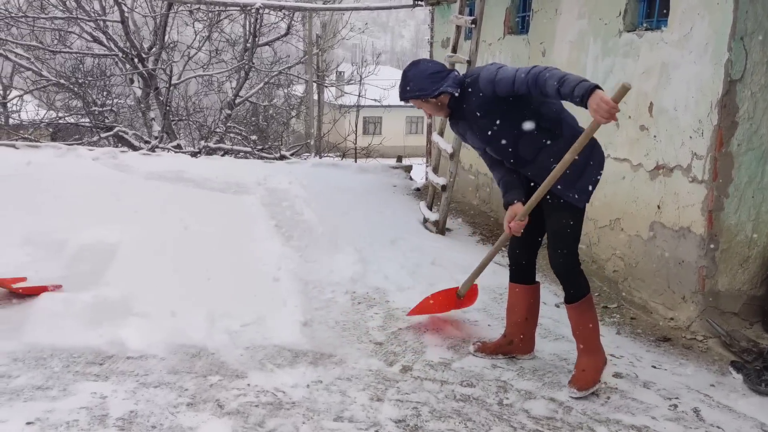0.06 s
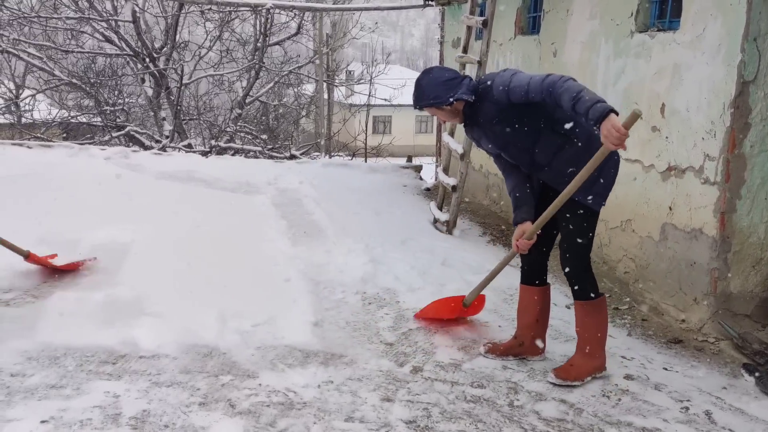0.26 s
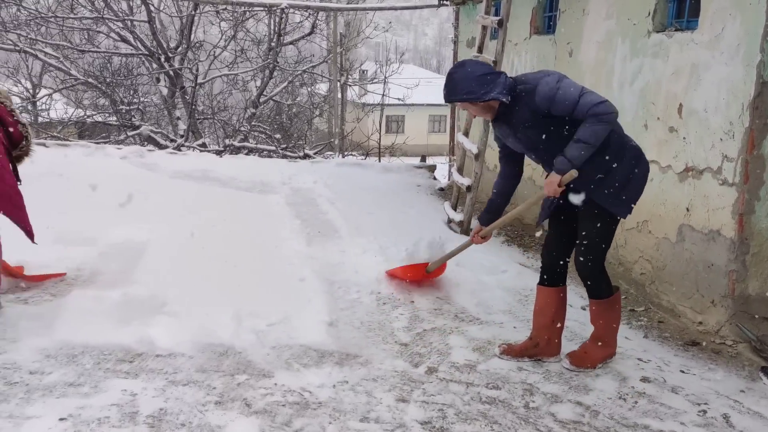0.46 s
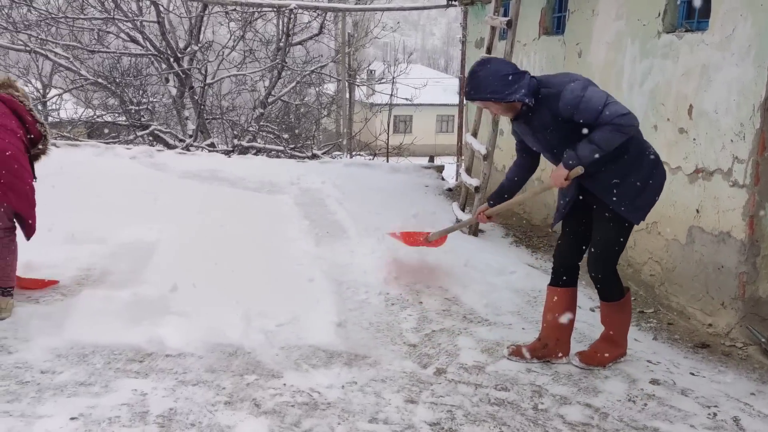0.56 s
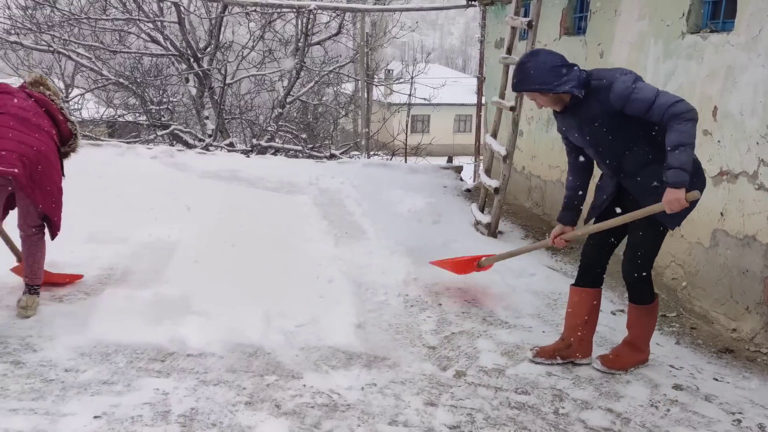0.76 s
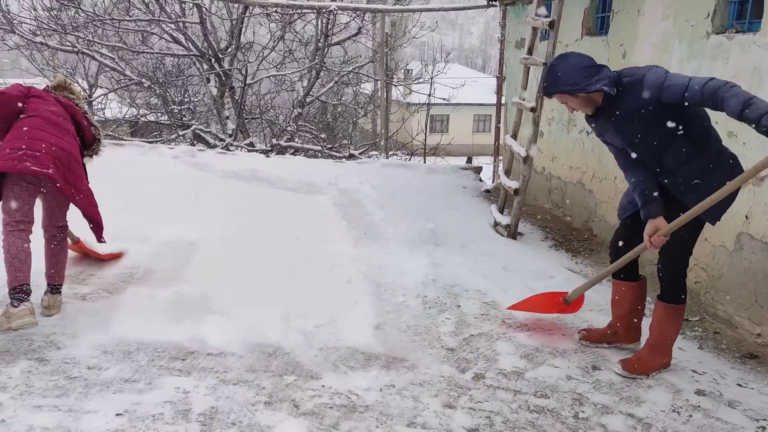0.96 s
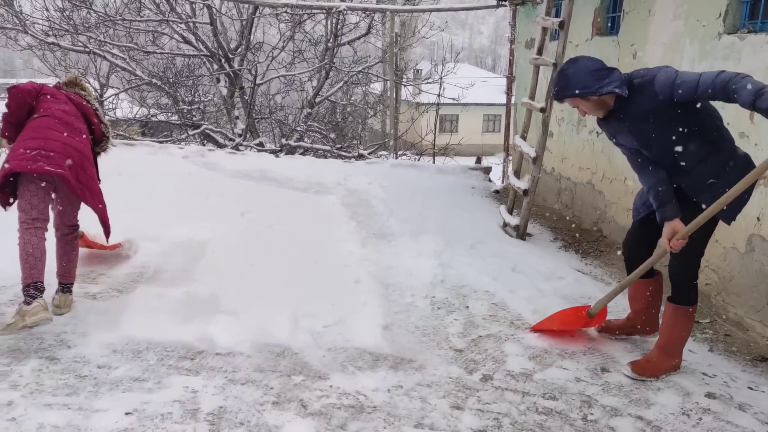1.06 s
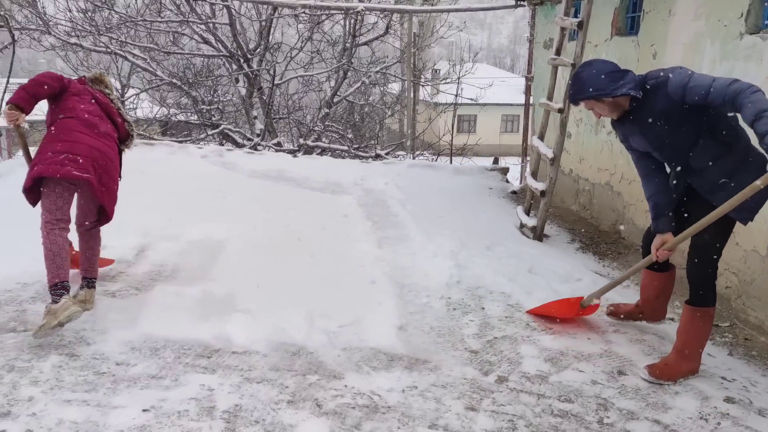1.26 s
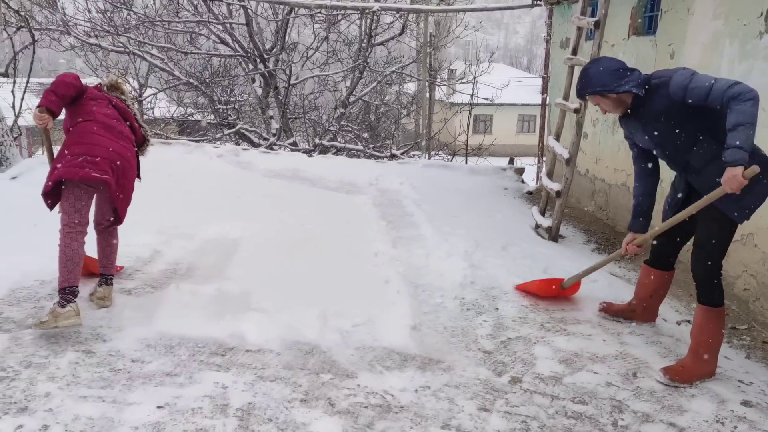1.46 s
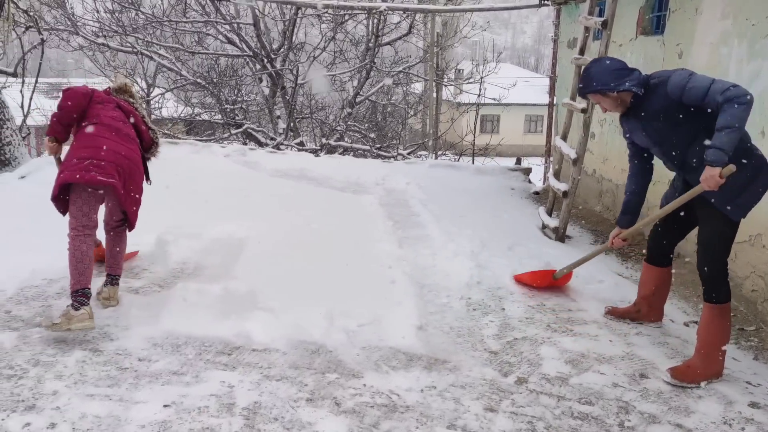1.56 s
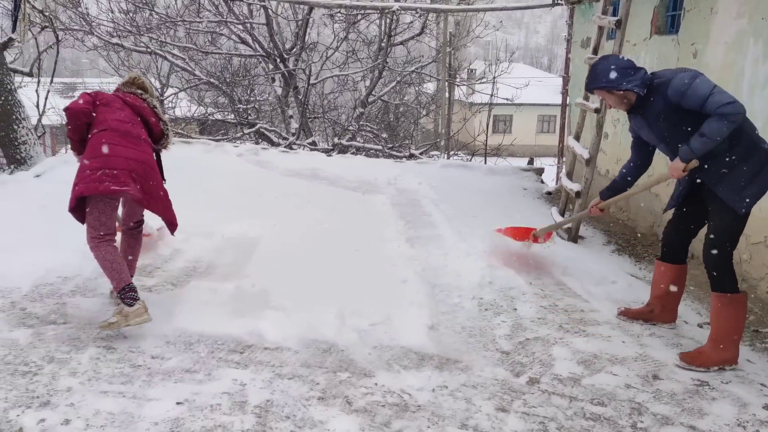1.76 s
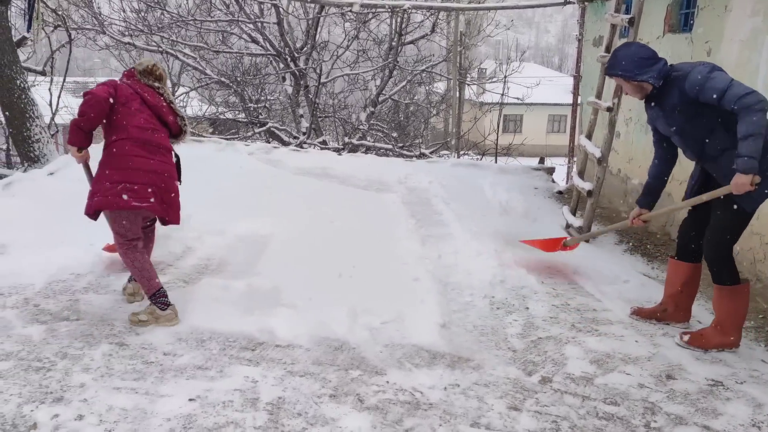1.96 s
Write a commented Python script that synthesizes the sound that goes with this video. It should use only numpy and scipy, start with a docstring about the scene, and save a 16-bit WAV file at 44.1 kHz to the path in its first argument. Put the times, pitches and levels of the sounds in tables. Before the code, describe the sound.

Two plastic shovels scrape gritty ice outdoors: a soft far scrape, a hard near stroke, a far push, then a long loud near push with crackling lumps, ending in near silence and a faint boot crunch.

```python
"""Two snow shovels on hard ice

A quiet yard with faint air: one plastic shovel scrapes close to the microphone, one farther off to the side.
Each edge sticks and slips: dense uneven clicks ring the blade, thump the load and crush grit and fine dust.
Lumps crack at their own pitch, the near blade lands with short pushes, ice snaps as bright noise, a boot crunches.
Decaying noise gives the short echo of wall and ground; the two microphone ports differ in time and colour."""
import sys
import numpy as np
from scipy import signal
from scipy.fft import rfft, irfft
from scipy.io import wavfile
from scipy.ndimage import uniform_filter1d

SR = 44100
rng = np.random.default_rng(int(sys.argv[2]) if len(sys.argv) > 2 else 0)


def log_audio(samples):
    """Write samples as a 16-bit WAV file to the path given in sys.argv[1]."""
    # one column per channel
    frames = np.atleast_2d(samples).T
    # limit to full scale, then quantise
    limited = np.clip(frames, -1, 1)
    pcm = np.round(limited * 32767).astype(np.int16)
    wavfile.write(sys.argv[1], SR, pcm)


N = 88200

# colour of the yard air: (frequency [Hz], relative level [dB])
YARD_COLOUR = [(15, -29), (25, 6.5), (66, -5), (293, -4.5), (1440, -7.5), (2840, -11), (4740, -8.5),
               (5140, -7.5), (7310, -10), (8140, -18), (10400, -19), (16000, -25)]
YARD_DB = -55
ECHO_DB, ECHO_T60_S, ECHO_LOW_HZ, ECHO_TOP_HZ = -25, 0.14, 300, 3560

# boot pressing snow: (time [s], level [dB])
BOOT_LEVEL = [(1.87, -63), (1.876, -54), (1.888, -46), (1.924, -46.5), (2.0, -41)]
BOOT_HZ, BOOT_WIDTH_HZ, BOOT_CRUNCH_DB = 215, 140, -11
BOOT_RIGHT_LAG = 10  # samples

# brittle ice snapping: (time [s], level before colouring [dB])
ICE_TICKS = [(.2925, -18), (0.373, -16), (0.465, -15.5), (.5982, -23), (.837, -30), (0.968, -22),
             (1.3605, -22)]
# colour of the snaps: (frequency [Hz], level [dB])
TICK_COLOUR = [(1500, -30), (3500, -3), (8000, -4), (16000, -11.5)]
TICK_S = 0.0009  # decay constant

# near blade set down hard: (time [s], blade peak [dB], thump peak [dB])
BLADE_LANDINGS = [(.2328, -21.5, -28), (.3065, -16, -30), (1.1703, -29.5, -31), (1.4197, -20, -22)]
LANDING_S = 0.00043  # decay constant of the push

# stretches of scraping, one list each: (time [s], blade ring [dB], low thump re blade [dB],
# grit re blade [dB], treble re blade [dB])
FAR_STRETCHES = [
    [(0.0, -44.5, -28, -1, -14), (0.068, -45, -9.5, 3, -13), (0.104, -39.5, -32, -1.5, -13),
     (0.158, -39.5, -27, 2.5, -15), (0.188, -29.5, -39, -3, -31), (0.214, -37.5, -14, 8, -13),
     (0.234, -30.5, 0, -3, -16), (0.27, -32, -13, -8.5, -25), (0.3, -39, -2, 5, -17)],
    [(0.595, -46.5, 4, 4, -11), (0.627, -43.5, -16, 5, -14), (0.641, -36, -10.5, -5.5, -18),
     (0.673, -47, -3, 3, -11), (0.691, -36.5, -25, -8.5, -20), (0.703, -48, -7, -1, -15),
     (0.719, -43, -4, -6.5, -17), (0.765, -71, 4, 10, 7), (0.77, -55, -9, -1, -8)],
]
NEAR_STRETCHES = [
    [(0.232, -33.5, 5, -2.5, -23), (0.286, -38.5, -12, 2, -16), (0.296, -40, -4, 0, -10),
     (0.306, -23.5, -8, -10, -26), (0.38, -19.5, -5.5, -7, -16.5), (0.404, -13.5, -13.5, -9.5, -28),
     (0.468, -22.5, -14, -0.5, -14), (0.476, -15.5, -11, -11.5, -27), (0.534, -23.5, -11, -8, -19.5),
     (0.58, -55, 8.5, 1.5, -9), (0.6, -57, -2, 8, 3)],
    [(1.169, -40, 6, -9, -21), (1.177, -31.5, -9, -3, -21), (1.198, -39.5, 0.5, -2.5, -17),
     (1.206, -45, -2, 2, -15), (1.218, -34, -2, -3.5, -16), (1.26, -52.5, 0, -1, -22),
     (1.265, -49, 12, -5, -15)],
]
# the far scrape carried on firmly: (time [s], blade [dB], thump, grit and treble re blade [dB])
FAR_PUSH = [(0.77, -48, -3, -7, -8), (0.78, -39, -20, -10, -29), (0.842, -33.5, -2.5, -5.5, -11.5),
            (0.85, -25, -21, -10, -19), (0.878, -28.5, -13, -5, -17), (0.902, -31.5, -9, 6, -3),
            (0.926, -23.5, -28, 0.5, -13), (0.936, -34.5, -3, 5.5, -6), (0.964, -32, -4.5, 4, -16),
            (0.984, -31.5, -7.5, 4.5, -11.5), (1.006, -49, 2, 8.5, -4), (1.054, -49.5, -12, 5.5, -6),
            (1.08, -72.5, -3, 15.5, 1), (1.12, -75, -1, 6, 1)]
# the near scrape carried on at length: (time [s], blade [dB], thump, grit and treble re blade [dB])
NEAR_PUSH = [(1.265, -37, 8, -10, -19), (1.279, -22.5, -3, -5.5, -23), (1.311, -20.5, -11, -10.5, -18.5),
             (1.345, -33.5, 4.5, -3, -17), (1.389, -19, -8.5, -7, -20), (1.409, -27, -5, -7, -21),
             (1.431, -18.5, -4, -1, -14), (1.455, -19, -2, -7, -16), (1.483, -17.5, -8.5, -6, -21.5),
             (1.515, -11, -15.5, -13, -30.5), (1.563, -20.5, -10, -2, -13), (1.593, -13, -32, -8, -21.5),
             (1.617, -17, -11, -8.5, -18), (1.637, -16, -2.5, -1.5, -25), (1.647, -18.5, -10.5, -9.5, -26),
             (1.697, -15, -11, -11.5, -28), (1.743, -24, -20, -12, -25), (1.751, -38, -9, -2.5, -17),
             (1.815, -53.5, 2, -9.5, -28), (1.86, -79, -3.5, 4, -3)]
# delay of the left port behind the right, one per near stretch, the push last [samples];
# negative means left is earlier
NEAR_LEFT_LAGS = [-2.48, -7, -6.5]
FAR_LEFT_LAG = 10.0  # samples

# lumps catching the edge: (time [s], crack level before the common trim [dB], blade drive re that level [dB],
# crack pitch [Hz], crumble decay [ms], treble re that level [dB])
FAR_LUMPS = [(0.0744, -27.5, -33, 4400, 2.2, -15), (0.1067, -23.5, -31, 3560, 5.3, -15),
             (0.1446, -27.5, -29, 4220, 4, -20), (0.18, -18, -10, 5800, 3.8, -22),
             (0.2084, -20.5, -37, 3880, 2.9, -12), (0.2172, -22.5, -17, 5030, 4.5, -22),
             (0.2922, -18, -27, 3770, 2.7, -20), (0.597, -26, -30, 4000, 1.5, -22),
             (0.629, -41, -16, 4900, 1.8, -26), (0.6414, -29, -12, 3930, 1.1, -21),
             (0.6614, -43, -1, 6540, 2, -27), (0.6904, -35, -8, 3630, 3.3, -23),
             (0.7387, -33, -12, 3720, 2.8, -25), (0.819, -28, -18, 5040, 3.7, -30),
             (0.837, -25, 5.5, 4200, 2.2, -21), (0.8484, -24, -1, 3640, 3.1, -24),
             (0.8744, -23, -5, 3620, 4.6, -27), (0.894, -15.5, -11, 3740, 3.7, -22),
             (0.9028, -13.5, -14.5, 4200, 3.4, -27), (0.9204, -13.5, -3, 4670, 1.3, -26),
             (0.9682, -11.5, -15.5, 4120, 2.5, -32), (0.9854, -19, -23, 5100, 1.9, -27),
             (1.0167, -40, -3, 3650, 1.9, -22), (1.049, -36, -12, 6680, 2.4, -28)]
NEAR_LUMPS = [(0.2332, -16, -2.5, 2060, 2.1, -17), (0.3076, -17.5, 5, 2100, 2.2, -30),
              (0.3142, -16.5, 6.5, 3700, 2.4, -25), (0.3436, -14, 1.5, 2090, 2.2, -30),
              (0.3546, -10.5, 1.5, 2080, 1.8, -28), (0.3734, -3.5, -3, 2180, 2.16, -21),
              (0.3905, -10.5, -1, 3550, 3.5, -31), (0.4, -5, 1, 2960, 3, -33),
              (0.4125, -7, -4.5, 2340, 1.7, -32), (0.4222, -12, -16, 2490, 1.9, -29),
              (0.4632, -14, -13, 2210, 1.9, -28), (0.5026, -12, -2, 2200, 2.5, -15),
              (1.1776, -32, 3, 4330, 1.8, -23), (1.2134, -28.5, 1, 2270, 1.8, -28),
              (1.2664, -31, -1, 4160, 2.2, -28), (1.276, -31, -4, 4130, 2.2, -20),
              (1.2958, -21.5, -7, 5280, 1.9, -15), (1.3135, -17.5, -1, 2450, 1.3, -18),
              (1.3602, -15.5, -5, 2230, 1.2, -23), (1.385, -11.5, -5.5, 2210, 2.5, -20),
              (1.4251, -9, -8, 2270, 3, -17), (1.4335, -6.5, -4, 2370, 3.4, -24),
              (1.4483, -11.5, 1.5, 4370, 2.1, -6), (1.4591, -10.5, 3, 2690, 2.5, -24),
              (1.4664, -10.5, -12, 2660, 2.3, -17), (1.4921, -15, -1, 2170, 2, -26),
              (1.532, -8, -3, 2220, 2.5, -30), (1.5863, -9, 1.5, 2450, 1.8, -16),
              (1.633, -18, -12, 2320, 1.3, -23), (1.7344, -24, 6, 2320, 1.8, -15)]
LUMP_TRIM_DB, LUMP_RING_DB, LUMP_Q, LUMP_THUMP_DB = -4.5, -2.7, 5.3, -10.5
OWN_NOISE = 0.43  # noise of lumps and snaps that each port hears on its own, re the common noise
KNOCK_S = 0.00019  # decay constant of a lump's knock on the blade

# modes of the blade: (frequency [Hz], width [Hz], near level [dB], far level [dB])
BLADE_MODES = [(543.8, 58, -2.5, -8), (608.7, 39.3, -0.5, 0.5), (650, 63, -0.5, -0.5), (813, 68, -3.5, -2),
               (923, 76, -5.5, -4), (1044, 137, -6, -1.5), (1148, 280, -13.5, -9.5), (1648, 73, -12.5, -5),
               (2476, 354, -17, -18)]
# modes of load and shaft: (frequency [Hz], width [Hz], near level [dB], far level [dB])
THUMP_MODES = [(103, 120, -12, -34), (158.2, 39.3, -2.5, 1.5), (234, 83, 3.5, -4), (322, 61, 0.5, -4.5),
               (459, 37, -3, -1)]
# upper modes of the edge, each on its own ice: (frequency [Hz], width [Hz], near level [dB], far level [dB])
EDGE_MODES = [(1840, 150, -32, -8.5), (2370, 200, 7.5, -15), (2600, 140, 2.5, -32), (3390, 78, -24, 1.5),
              (3540, 120, 4, -25), (3810, 140, 6.5, 9.5), (4500, 660, 2, 1.5), (4530, 93, -12.5, -7),
              (5370, 580, -3.5, -0.5), (6030, 540, -7, -4.5), (6790, 770, -7.5, 7), (7380, 170, -11.5, 0.5)]
# crushed grit under the near edge: (frequency [Hz], level [dB])
NEAR_GRIT = [(1200, -2.5), (2500, -2), (3800, 0.5), (5500, -2), (7400, -6), (8400, -20.5), (16000, -35)]
# crushed grit under the far edge: (frequency [Hz], level [dB])
FAR_GRIT = [(1200, -6), (2500, -0.5), (4200, 0), (5500, 1), (7400, 5), (8400, -22.5), (16000, -36)]
# finest grit: (frequency [Hz], near level [dB], far level [dB])
DUST_COLOUR = [(6000, -13, -37), (8270, 0, -2), (10600, -4.5, -5.5), (12900, -8, -14), (16000, -10, -13)]
# near shovel off to one side: (frequency [Hz], left over right [dB])
NEAR_SIDE = [(200, -5.5), (650, -1.5), (1500, -1), (4600, -0.5), (12000, 5)]
# far shovel off to one side: (frequency [Hz], left over right [dB])
FAR_SIDE = [(200, -5), (650, -3.5), (1500, -2.5), (4600, -1.5), (12000, 1)]
SLIPS_PER_S, SLIP_SCATTER_DB, LOAD_SCATTER_DB = 1500, 3, 2
GRAINS_PER_S, GRAIN_SCATTER_DB = 9000, 3.0
JUDDER_PER_S, JUDDER_DB, GRIT_JUDDER_DB, DUST_JUDDER_DB = 100, 1, 3.5, 2.2
EDGE_DB, PATCH_PER_S, PATCH_DB = -6, 90, -0.5
BLADE_APART, GRIT_APART, DUST_APART = 0.32, 0.65, 0.96  # amplitude of the clicks each port hears on its own
BLADE_LOW_HZ = 300
# bass cut of the sources, near then far [Hz]
LOW_CUTS_HZ = [111.4, 160]

# colour between the microphone ports: (frequency [Hz], left over right [dB])
PORT_COLOUR = [(100, 6), (650, 2), (1300, 1.5), (2400, 2), (4600, -4), (6200, 3), (7700, 7.5), (10000, 7),
               (15000, -4.5)]
TOP_HZ, CEILING = 16000, 0.95


def undb(db):
    """Amplitude factor of a level in dB."""
    return 10 ** (np.asarray(db) / 20)


def unit(x):
    """Scale to an rms of 1."""
    return x / np.sqrt(np.mean(x ** 2))


def shape(x, table, lag=0.):
    """Colour by (Hz, dB) points and delay by a number of samples, whole or not."""
    f = np.arange(N // 2 + 1) * SR / N
    hz, db = np.array(table, float).T
    gain = undb(np.interp(np.log(f + 1), np.log(hz), db))
    delay = np.exp(-2j * np.pi * f * lag / SR)
    return irfft(rfft(x) * gain * delay, N)


def ring(x, modes):
    """Sum of decaying modes (Hz, width Hz, dB), neighbours in opposite phase."""
    out = 0
    for k, (hz, width, db) in enumerate(modes):
        pole = np.exp((2j * np.pi * hz - np.pi * width) / SR)
        mode = signal.lfilter([1], [1, -pole], x, axis=-1).imag
        out = out + (-1) ** k * undb(db) * width * mode
    return out


def walk(rate):
    """Random levels held 1 / rate s and slewed; spread near 1."""
    hold = int(SR / rate)
    steps = np.repeat(rng.standard_normal(N // hold + 1), hold)
    return uniform_filter1d(steps, hold // 2)[:N]


def clicks(rate, scatter_db, apart):
    """Dense clicks of random sign and very uneven size, in part common to both ports."""
    chance, sign, size = rng.random((3, 3, N))
    extra_db = scatter_db * np.minimum(-np.log(size + 1e-9), 5)
    train = (chance < rate / SR) * np.sign(sign - .5) * undb(extra_db)
    return unit(np.sqrt(1 - apart ** 2) * train[0] + apart * train[1:])


def yard():
    """Faint still air as coloured noise, alike at both ports only in the bass."""
    noise = rng.standard_normal((2, N))
    mid = shape(noise[0], YARD_COLOUR)
    side = shape(shape(noise[1], YARD_COLOUR), [(30, -4), (70, -16), (200, -5.5), (1500, 0.5)])
    return unit(np.array([mid + side, mid - side])) * undb(YARD_DB)


def echo(x):
    """Short dull scatter from wall and ground: decaying band-limited noise convolved with the mono sum."""
    t = np.arange(int(.4 * SR)) / SR
    scatter = rng.standard_normal((2, len(t))) * undb(-60 * t / ECHO_T60_S)
    scatter = scatter * (t > .006)  # the way to the reflecting surfaces and back
    scatter = signal.lfilter(*signal.butter(1, [ECHO_LOW_HZ, ECHO_TOP_HZ], "band", fs=SR), scatter)
    scatter = scatter / np.sqrt(np.sum(scatter ** 2) / 2)
    return signal.fftconvolve(x.mean(0)[None], scatter, axes=1)[:, :N] * undb(ECHO_DB)


def boot():
    """Boot settling in snow: grains give way as clicks through a low resonance and a broad crunch."""
    s, db = np.array(BOOT_LEVEL, float).T
    press = clicks(900, 2.2, 0)[0]
    thud = ring(press, [(BOOT_HZ, BOOT_WIDTH_HZ, 0)])
    thud = unit(ring(thud, [(BOOT_HZ, BOOT_WIDTH_HZ * 2, 0)]))
    crunch = unit(ring(press, [(745, 600, 0)]))
    level = undb(np.interp(np.arange(N) / SR, s, db, left=-120))
    x = (thud + undb(BOOT_CRUNCH_DB) * crunch) * level
    return np.array([x, np.roll(x, BOOT_RIGHT_LAG)])


def ticks():
    """Brittle ice snaps: dry, bright bursts of decaying noise."""
    out = np.zeros((2, N))
    tail = np.exp(-np.arange(300) / (TICK_S * SR))
    noise = rng.standard_normal((len(ICE_TICKS), 3, 300))
    for (s, db), z in zip(ICE_TICKS, noise):
        i = int(s * SR)
        snap = tail * (z[0] + OWN_NOISE * z[1:])
        level = np.sqrt(np.sum(snap ** 2) / np.sum(tail ** 2) / 2)
        out[:, i:i + 300] += undb(db) * snap / level
    return np.array([shape(x, TICK_COLOUR) for x in out])


def landings():
    """The near blade meets the ice: one short push rings blade and load."""
    out = np.zeros((2, N))
    push = np.exp(-np.arange(300) / (LANDING_S * SR))
    for s, blade_db, thump_db in BLADE_LANDINGS:
        i = int(s * SR)
        for modes, db in ((BLADE_MODES, blade_db), (THUMP_MODES, thump_db)):
            x = np.zeros(N)
            x[i:i + 300] = push
            x = ring(x, [m[:3] for m in modes])
            out += undb(db) * x / np.abs(x).max()
    return out


def lumps(table):
    """Each lump cracks at its own pitch and crumbles for a few ms; returns grit, treble and blade drive."""
    n = np.arange(600)
    noise = rng.standard_normal((len(table), 3, 600))
    grit, treble, blade = np.zeros((2, N + 600)), np.zeros((2, N + 600)), np.zeros(N + 600)
    for (s, db, ring_db, hz, ms, treble_db), z in zip(table, noise):
        i = int(s * SR)
        tail = np.exp(-n / (ms * SR / 1000))
        z = z[0] + OWN_NOISE * z[1:]
        pitched = unit(signal.lfilter(*signal.iirpeak(hz, LUMP_Q, SR), z))
        crack = tail * (z + undb(LUMP_RING_DB) * pitched)
        level = np.sqrt(np.sum(crack ** 2) / np.sum(tail ** 2) / 2)
        grit[:, i:i + 600] += undb(db + LUMP_TRIM_DB) * crack / level
        treble[:, i:i + 600] += undb(db + treble_db) * tail ** 2 * unit(z)
        blade[i:i + 600] += undb(db + ring_db) * np.exp(-n / (KNOCK_S * SR))
    return grit[:, :N], treble[:, :N], blade[:N]


def shovel(stretches, lags, lump_table, column, grit_colour, side):
    """Slips ring the blade, the load thumps and grains crush under the edge; blade and grains judder together."""
    t = np.arange(N) / SR
    judder = walk(JUDDER_PER_S)

    def pick(modes):
        return [(m[0], m[1], m[column]) for m in modes]

    def blade(x):
        high = signal.butter(2, BLADE_LOW_HZ, "high", fs=SR)
        return signal.lfilter(*high, ring(x, pick(BLADE_MODES)))

    def thump(x):
        return ring(x, pick(THUMP_MODES))

    def grit(x):
        return shape(x, grit_colour)

    def fine(x):
        return shape(x, [(m[0], m[column - 1]) for m in DUST_COLOUR])

    def scale(body, x):
        return 1 / np.sqrt(np.mean(body(x) ** 2))

    slips = clicks(SLIPS_PER_S, SLIP_SCATTER_DB, BLADE_APART) * undb(JUDDER_DB * judder)
    load = clicks(SLIPS_PER_S, LOAD_SCATTER_DB, 0)
    grain_judder = (judder + walk(JUDDER_PER_S * 2)) / 2
    grains = clicks(GRAINS_PER_S, GRAIN_SCATTER_DB, GRIT_APART) * undb(GRIT_JUDDER_DB * grain_judder)
    dust = clicks(GRAINS_PER_S, GRAIN_SCATTER_DB, DUST_APART) * undb(DUST_JUDDER_DB * judder)
    edge = unit(sum(ring(grains * undb(PATCH_DB * walk(PATCH_PER_S)), [m]) for m in pick(EDGE_MODES)))
    crack, spit, knock = lumps(lump_table)

    # steady scraping brings each body to an rms of 1
    blade_gain, thump_gain = scale(blade, slips), scale(thump, load)
    grit_gain, fine_gain = scale(grit, grains), scale(fine, dust)
    left = [(hz, db / 2) for hz, db in side]
    right = [(hz, -db / 2) for hz, db in side]
    out = np.zeros((2, N))
    for rows, lag in zip(stretches, lags):
        s, db, low_db, grit_db, treble_db = np.array(rows, float).T
        on = (t >= s[0]) & (t < s[-1])

        def env(level_db):
            return on * undb(np.interp(t, s, level_db))

        x = blade_gain * blade(slips * env(db) + on * knock)
        x = x + thump_gain * thump(load * env(db + low_db) + undb(LUMP_THUMP_DB) * on * knock)
        x = x + grit_gain * grit(grains * env(db + grit_db) + on * crack)
        x = x + edge * env(db + grit_db + EDGE_DB)
        x = x + fine_gain * fine(dust * env(db + treble_db) + on * spit)
        out += [shape(x[0], left, max(lag, 0)), shape(x[1], right, max(-lag, 0))]
    return out


def scene():
    """Yard air and echo behind the far shovel, the near shovel and the small sounds beside it."""
    far = shovel(list(FAR_STRETCHES) + [FAR_PUSH], [FAR_LEFT_LAG] * 3, FAR_LUMPS,
                 column=3, grit_colour=FAR_GRIT, side=FAR_SIDE)
    near = shovel(list(NEAR_STRETCHES) + [NEAR_PUSH], NEAR_LEFT_LAGS, NEAR_LUMPS,
                  column=2, grit_colour=NEAR_GRIT, side=NEAR_SIDE)
    near = near + landings() + ticks() + boot()
    work = np.zeros((2, N))
    # the deep bass is cut away, at its own corner for the near and the far shovel
    for x, hz in zip((near, far), LOW_CUTS_HZ):
        work += signal.sosfilt(signal.butter(4, hz, "high", fs=SR, output="sos"), x)
    return work + echo(work) + yard()


def record(dry):
    """Each microphone port has its own colour; peaks are rounded and the top is cut steeply."""
    left = shape(dry[0], [(hz, db / 2) for hz, db in PORT_COLOUR])
    right = shape(dry[1], [(hz, -db / 2) for hz, db in PORT_COLOUR])
    both = np.array([left, right])
    both = both / (1 + (both / CEILING) ** 4) ** .25
    return signal.sosfilt(signal.ellip(10, .2, 70, TOP_HZ, fs=SR, output="sos"), both)


dry = scene()
out = record(dry)
log_audio(out)
```